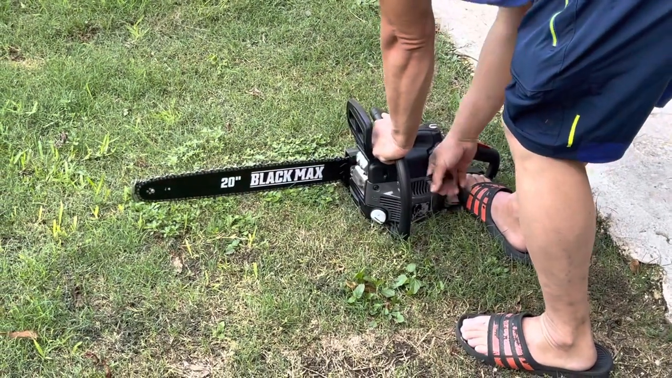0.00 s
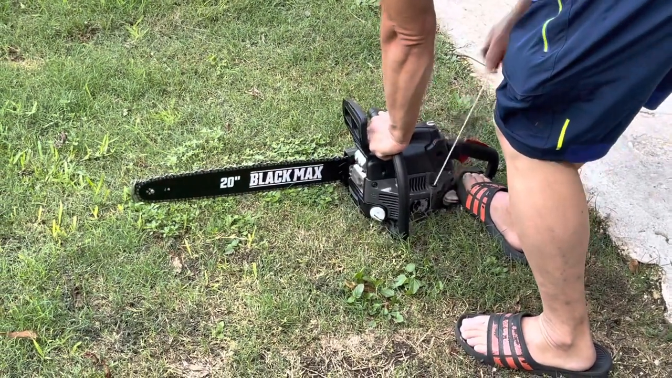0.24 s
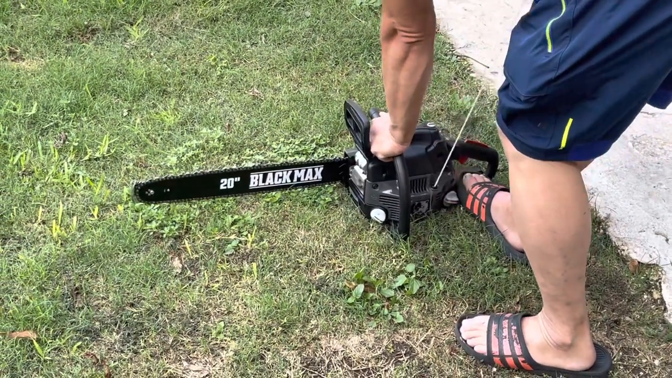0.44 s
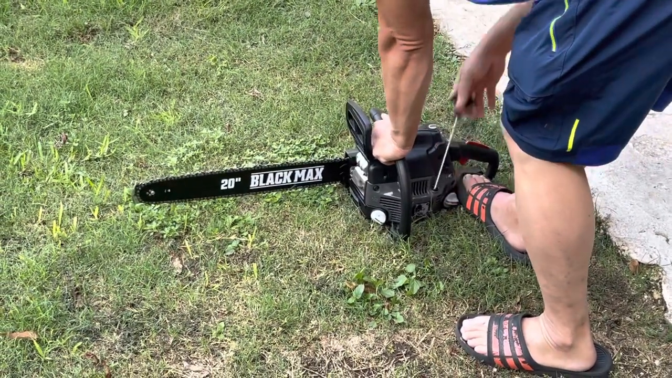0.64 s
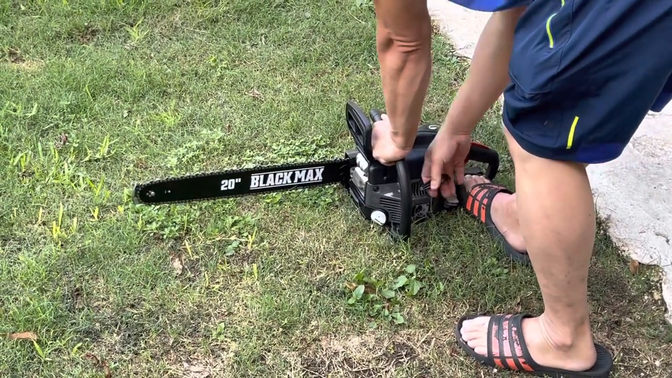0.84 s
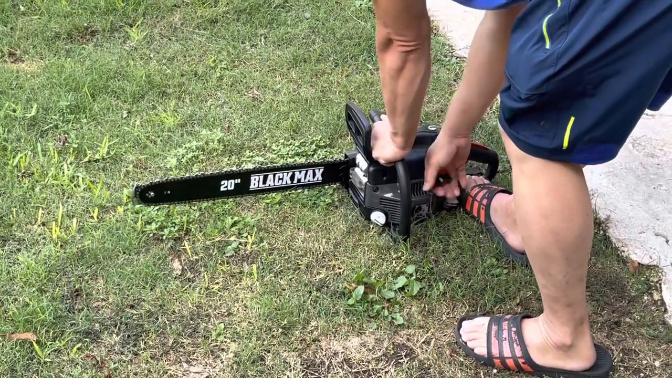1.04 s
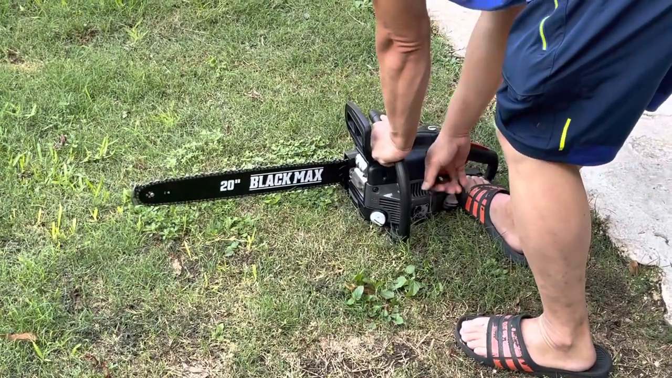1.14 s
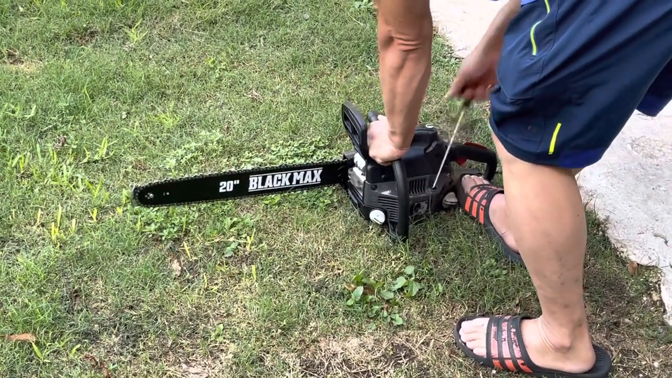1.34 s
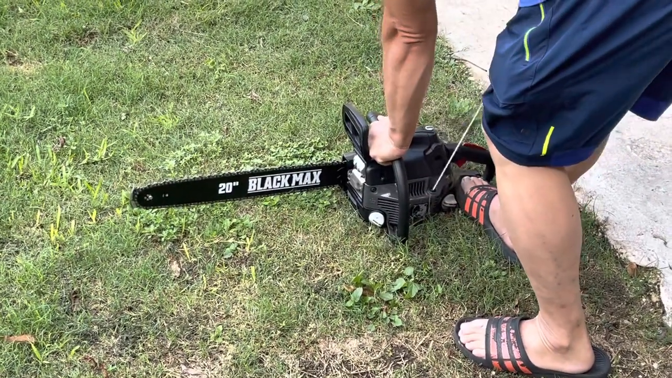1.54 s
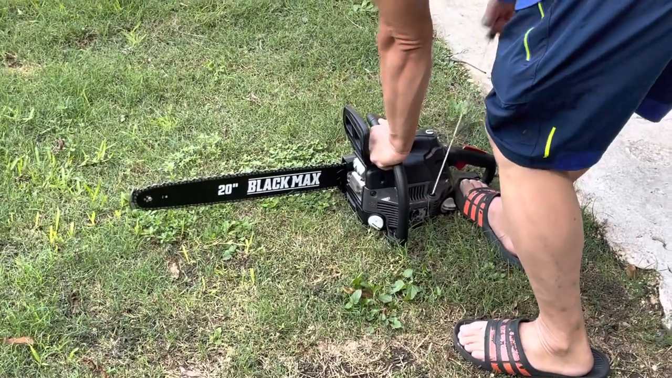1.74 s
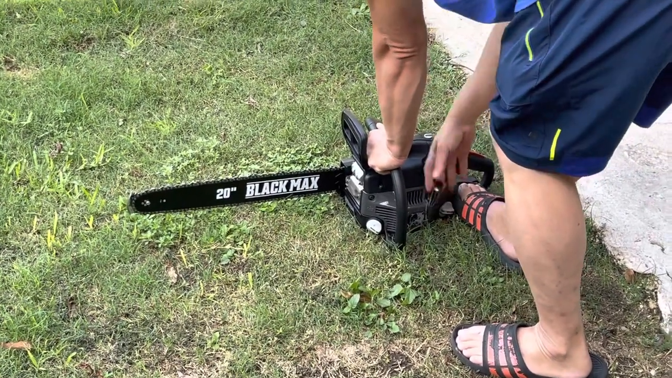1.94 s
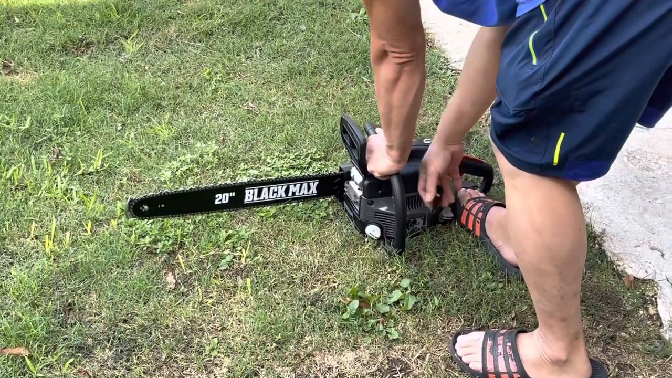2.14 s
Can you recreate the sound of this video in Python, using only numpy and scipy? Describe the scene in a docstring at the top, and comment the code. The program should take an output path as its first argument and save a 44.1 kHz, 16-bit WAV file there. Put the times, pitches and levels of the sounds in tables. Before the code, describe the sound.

Chainsaw starter cord pulled twice, dead engine chugging briefly, cord ratcheting back with a handle knock

```python
"""A chainsaw on a lawn with far traffic rumbling throughout, picked up close by two microphone ports.
First pull: the cord hisses out, cord and flywheel whir, and the dead engine turns over in a few pops.
The cord then rewinds in ratcheting steel pawl clicks until the plastic handle knocks home; the second pull
does the same. Pops and rings are damped sines; hiss, whir, gas and knocks are shaped noise.
Nearby walls answer every sound of the saw, and the two ports hear its treble out of phase."""
import sys
import numpy as np
from scipy import signal
from scipy.fft import rfft, irfft, next_fast_len
from scipy.io import wavfile
from scipy.ndimage import map_coordinates

SR = 44100
rng = np.random.default_rng(int(sys.argv[2]) if len(sys.argv) > 2 else 0)


def bounce(signal):
    """Save signal as a 16-bit WAV file at the path given by the first command-line argument."""
    frames = np.transpose(np.atleast_2d(signal))
    limited = np.clip(frames, -1, 1)
    pcm = np.round(limited * 32767).astype(np.int16)
    wavfile.write(sys.argv[1], SR, pcm)


N = 97020  # samples, 2.2 s


def amp(db):
    """Convert dB to gain."""
    return 10 ** (np.asarray(db) / 20)


def unit(x):
    """Scale to rms 1."""
    return x / np.sqrt(np.mean(x ** 2) + 1e-20)


def along(points, hz):
    """Read (pitch_hz, value) points along a logarithmic frequency axis."""
    point_hz, value = np.transpose(points)
    return np.interp(np.log(hz + 1), np.log(point_hz + 1), value)


def fader(points):
    """Gain that follows (time_s, level_db) points, at -120 dB outside them."""
    return amp(np.interp(np.arange(N) / SR, *np.transpose(points), left=-120, right=-120))


def filtered(x, response):
    """Filter x by a complex response of frequency."""
    m = next_fast_len(N + SR // 2)
    return irfft(rfft(x, m) * response(np.fft.rfftfreq(m, 1 / SR)), m)[..., :N]


def noise(spectrum, peaks=(), peaks_db=0):
    """Noise of rms 1 with a spectrum in dB per Hz and resonances raised above it."""
    def response(hz):
        resonances = sum(amp(db) / np.hypot(1, 2 * (hz - centre) / width) for centre, width, db in peaks)
        return amp(along(spectrum, hz)) * (1 + amp(peaks_db) * resonances)
    return unit(filtered(rng.standard_normal(N), response))


def bursts(rows, attack_s):
    """Envelope of (start_s, level_db, t60_s) bursts that rise quickly, decay exponentially and add in power."""
    t = np.arange(N) / SR
    power = 0
    for start_s, db, t60_s in rows:
        age = np.clip(t - start_s, 0, None)
        power = power + (amp(db - 60 * age / t60_s) * (1 - np.exp(-age / attack_s))) ** 2
    return np.sqrt(power)


GLIDE_S = 0.0041  # time constant of the pitch glide


def tone(start_s, db, start_hz, end_hz, t60_s):
    """A damped sine whose pitch relaxes exponentially from start_hz to end_hz."""
    age = np.clip(np.arange(N) / SR - start_s, 0, None)
    turns = end_hz * age + (start_hz - end_hz) * GLIDE_S * (1 - np.exp(-age / GLIDE_S))
    return amp(db - 60 * age / t60_s) * np.sin(2 * np.pi * turns)


# colour of the far rumble: pitch_hz, level_db (per Hz, relative)
TRAFFIC_COLOUR = [(12, -30), (20, -53.5), (59, 0), (130, -6), (165, -4.5), (295, -20.5), (337, -18.5),
                  (872, -25), (944, -26), (1200, -31.5), (2380, -40.5), (9640, -58), (11000, -66),
                  (14300, -109), (22000, -120)]
# slow drift of the rumble: time_s, level_db
TRAFFIC_LEVEL = [(0.0, -35), (0.19, -34), (1.11, -36.5), (1.7, -37.5), (2.05, -37.5), (2.2, -36.5)]
# stereo width of the rumble: pitch_hz, side_over_mid_db
TRAFFIC_WIDTH = [(60, -27.5), (130, -17), (290, -10), (640, -1.5), (1410, -3), (3100, -20), (6820, -22),
                 (15000, 27)]


def traffic():
    """Far rumble of coloured noise, near mono in the bass because the side part is weak there."""
    mid = noise(TRAFFIC_COLOUR)
    side = filtered(noise(TRAFFIC_COLOUR), lambda hz: amp(along(TRAFFIC_WIDTH, hz)))
    return fader(TRAFFIC_LEVEL) * np.array([mid + side, mid - side])


WALLS_DELAY_S = .012
# how fast the answer of the walls dies: pitch_hz, t60_s
WALLS_DECAY = [(200, 0.57), (2000, 0.49), (6000, 0.49), (12000, 0.35), (13500, 0.14)]


def walls(x):
    """Decaying scatter, faster in the treble; eight tails take turns every 5 ms. Returns echo and side part."""
    delayed = np.pad(x, (round(WALLS_DELAY_S * SR), 0))
    hz, t, cells = signal.stft(rng.standard_normal((8, 2, SR // 2)), SR, nperseg=256)
    decay = amp(-60 * t / along(WALLS_DECAY, hz)[:, None])
    tails = signal.istft(cells * decay, SR, nperseg=256)[1]
    turn = np.arange(len(delayed)) // (SR // 200) % len(tails)
    answer = 0
    for k, tail in enumerate(tails):
        heard = (delayed * (turn == k))[None]
        answer = answer + signal.fftconvolve(heard, tail / np.linalg.norm(tail[0]), axes=1)[:, :N]
    return answer


# hiss of the cord, one list per pull: time_s, level_db
CORD_HISS = [
    [(0.0, -75), (0.122, -58), (0.246, -55), (0.372, -62.5), (0.55, -60)],
    [(1.15, -77), (1.266, -62.5), (1.486, -70.5), (1.7, -57.5)],
]
# colour of the hiss: pitch_hz, level_db (per Hz, relative)
CORD_COLOUR = [(3500, -24.5), (6000, -4.5), (9000, 1.5), (11500, -2), (12800, -23.5), (13500, -60)]


def cord():
    """Fine treble noise as the cord runs out in each pull."""
    return sum(fader(pull) for pull in CORD_HISS) * noise(CORD_COLOUR)


GRAIN_HZ, GRAIN_DB = 315, 3.5  # random level points per second, and their spread
CASING_DB = -1  # gain of all casing resonances
# whir of cord and flywheel, one list per pull: time_s, level_db
WHIR_LEVEL = [
    [(0.2, -117), (0.242, -35), (0.366, -50), (0.45, -72.5)],
    [(1.2, -64), (1.28, -58), (1.46, -38.5), (1.6, -64.5)],
]
# colour of the casing, for whir and clatter: pitch_hz, level_db (per Hz, relative)
CASE_COLOUR = [(410, -28.5), (700, -7), (990, -22.5), (2110, -2), (2300, -8.5), (3910, -5), (4270, -12.5),
               (7830, -14.5), (10000, -13), (11800, -15.5), (13500, -49)]
# casing resonances in the whir: pitch_hz, width_hz, level_db (before CASING_DB)
CASING_PEAKS = [(1450, 120, 3), (2250, 27, -8), (2750, 200, -4), (3750, 68, -19)]


def whir():
    """Cord and flywheel scrape: noise through the casing, made grainy by a random level."""
    grain_points = np.arange(N) / SR * GRAIN_HZ
    grain = amp(GRAIN_DB * map_coordinates(rng.standard_normal(N), [grain_points]))
    scrape = unit(grain * noise(CASE_COLOUR, CASING_PEAKS, CASING_DB))
    return sum(fader(pull) for pull in WHIR_LEVEL) * scrape


CLATTER_DB = -7  # gain of the noisy knocks only
# knocks as parts take up play: start_s, level_db (of the ring's reference), t60_s (of the knock),
# ring_hz, ring_db (relative to level_db)
CLATTER_KNOCKS = [(0.0734, -23, 0.018, 1650, -10.5), (0.2413, -24, 0.021, 2750, 1.5),
                  (0.25, -12, 0.014, 1470, -7), (.266, -24, 0.035, 3200, -3),
                  (.286, -17.5, .02, 2700, -7.5), (.304, -21, 0.043, 2140, -16),
                  (0.339, -28, .03, 1450, -5.5), (.349, -38, .025, 1473, 5), (0.362, -36, 0.021, 2690, 3.5),
                  (1.360, -25, .04, 2750, -1), (1.367, -20.5, 0.055, 2090, -13.5),
                  (1.399, -28.5, 0.037, 3030, -4), (1.408, -17, .03, 1915, -14.5),
                  (1.4238, -19, .03, 3290, -14), (1.445, -25, .03, 2700, -7),
                  (1.454, -21, 0.023, 2810, -13.5), (1.493, -38, 0.039, 1415, 6.5),
                  (1.512, -33.5, 0.024, 2750, 5.5)]


def clatter():
    """Parts taking up play knock the casing: a short noise burst and one ring that lasts slightly longer."""
    envelope = amp(CLATTER_DB) * bursts([row[:3] for row in CLATTER_KNOCKS], 0.0003)
    rings = sum(tone(start_s, db + ring_db, hz, hz, 1.11 * t60_s)
                for start_s, db, t60_s, hz, ring_db in CLATTER_KNOCKS)
    return rings + envelope * noise(CASE_COLOUR, [(8100, 490, 0)])


RATTLE_DB, BODY_DB = -11.5, 2  # added to every rattle and every cover knock
CRACK_T60_S = 0.012
# pawl clicks: start_s, level_db (reference of the click), t60_s (of rattle and cover),
# body_db, ring_db, crack_db (relative to level_db, body_db before BODY_DB)
PAWL_CLICKS = [(0.1021, -41.5, 0.032, 6.5, -5.5, -3), (0.1208, -15, 0.024, -9.5, -2.5, -3),
               (0.5265, -39, 0.14, -6, -7, -2.5), (0.5578, -16, 0.079, -13, 0.5, 2),
               (0.5844, -13.5, 0.049, -12.5, -5, 2), (0.6089, -11, 0.05, -18.5, -3, -0.5),
               (0.632, -12.5, 0.038, -10.5, -2.5, -5.5), (0.6554, -12, 0.05, -15.5, -6.5, 3.5),
               (0.676, -14, 0.064, -11, -1.5, -5.5), (0.7063, -15.5, 0.057, -13, -3, -0.5),
               (0.7364, -12.5, 0.029, -10.5, -1.5, 4.5), (0.7568, -10, 0.052, -15, -4, -3.5),
               (0.7634, -7, 0.027, -24, -7.5, -0.5), (1.6706, -40.5, 0.14, -4, -2, -9),
               (1.7023, -13, 0.064, -13, -2, -1.5), (1.7262, -12.5, 0.081, -15, -1.5, 1.5),
               (1.7477, -12.5, 0.063, -18.5, -0.5, 1.5), (1.7697, -12.5, 0.082, -15, -6, -1),
               (1.7902, -9, 0.046, -17, -3.5, -3), (1.8103, -8.5, 0.049, -19, 0, -4),
               (1.8301, -12, 0.05, -16, -2, -3), (1.8512, -13, 0.053, -13.5, -2, 4.5),
               (1.8685, -9, 0.045, -16, -3, -3.5), (1.8848, -10, 0.1, -14.5, -8, 5),
               (1.9, -8.5, 0.017, -0.5, -4.5, 0)]
# steel modes of the pawl: pitch_hz, level_db (both before random scatter), t60_s
PAWL_MODES = [(3536, -31, 0.057), (4065, -16.5, 0.052), (4650, -24.5, 0.17), (5100, -18, 0.11),
              (5370, -20, .05), (6080, -26.5, 0.097), (6640, -29.5, 0.1), (8440, -10, 0.029),
              (9060, -18.5, 0.082), (10700, 10, 0.013), (11485, -1.5, 0.034), (11940, -12, .04),
              (14260, -19, 0.043)]
# colour of crack and rattle: pitch_hz, level_db (per Hz, relative)
RATTLE_COLOUR = [(590, -46), (1000, -24), (5170, -17.5), (6530, -11.5), (8860, -10.5), (9960, -1.5),
                 (11200, -2), (13500, -26), (15400, -21.5), (16500, -53)]
# colour of the plastic starter cover: pitch_hz, level_db (per Hz, relative)
COVER_COLOUR = [(450, -25.5), (680, -2), (1000, -28), (1500, -15), (2170, -8), (3180, -6.5), (3580, -2),
                (5000, -12.5), (6500, -16.5), (11000, -86)]


def pawl_ring(draws):
    """Sum of damped steel modes, each with its own random level, pitch, phase and wobble rate."""
    t = np.arange(SR // 4) / SR
    ring = 0
    for (hz, db, t60_s), (a, b, c) in zip(PAWL_MODES, draws):
        wobble = 1.5 * np.sin(2 * np.pi * 55 * (1 + 0.21 * c) * t)  # radians, around 55 Hz
        phase = 2 * np.pi * hz * (1 + 0.0033 * b) * t + 3 * c + wobble
        ring = ring + amp(db + 4.6 * a - 60 * t / t60_s) * np.sin(phase)
    return ring * (1 - np.exp(-t / 0.0015))


def pawl():
    """Every click cracks, rings the steel anew with an unsteady pitch, rattles briefly and knocks the cover."""
    rings = np.zeros(N + SR)
    chance = rng.standard_normal((len(PAWL_CLICKS), len(PAWL_MODES), 3))
    for (start_s, db, _, _, ring_db, _), draws in zip(PAWL_CLICKS, chance):
        ring = pawl_ring(draws)
        rings[round(start_s * SR):][:len(ring)] += amp(db + ring_db) * ring
    rattle = bursts([(s, db + RATTLE_DB, t60_s) for s, db, t60_s, *_ in PAWL_CLICKS], 0.00089)
    crack = bursts([(s, db + crack_db, CRACK_T60_S) for s, db, *_, crack_db in PAWL_CLICKS], 0.00046)
    cover = bursts([(s, db + body_db + BODY_DB, t60_s) for s, db, t60_s, body_db, *_ in PAWL_CLICKS], 0.0015)
    return rings[:N] + np.hypot(rattle, crack) * noise(RATTLE_COLOUR) + cover * noise(COVER_COLOUR)


KNOCK_DB, HOUSING_DB = -8, 3.5  # gain of all knocks, gain of the resonances
SPLIT_HZ = 1590  # between hollow body and clack
# the handle knocking home: start_s, clack_db, hollow_db (both before KNOCK_DB), t60_s
HANDLE_KNOCKS = [(0.739, -15, -9, 0.039), (0.756, -7.5, -24, 0.055), (0.7596, -9.5, -5, 0.047),
                 (0.767, -26, -19, .03), (1.898, -7, -30, 0.072), (1.900, 0, -6.5, 0.027),
                 (1.902, -3, 0.5, 0.024), (1.907, -12.5, -6.5, 0.023)]
# colour of the plastic handle: pitch_hz, level_db (per Hz, relative)
HANDLE_COLOUR = [(150, -40), (250, -5), (736, 10), (1040, -6), (1510, 3), (2330, -2.5), (3010, -0.5),
                 (4250, -14), (8230, -5.5), (9000, -1.5), (11700, -44), (19800, -120)]
# resonances of the housing: pitch_hz, width_hz, level_db (before HOUSING_DB)
HOUSING_PEAKS = [(760, 180, -2.5), (1160, 120, 14), (1460, 37, 8.5), (1970, 73, 2.5), (3030, 1300, -1),
                 (3680, 100, 8.5)]


def handle():
    """The plastic handle knocks home: a bright clack, and a hollow body that swells more slowly."""
    def low(hz):
        return 1 / (1 + (hz / SPLIT_HZ) ** 6)
    clack = unit(filtered(noise(HANDLE_COLOUR, HOUSING_PEAKS, HOUSING_DB), lambda hz: 1 - low(hz)))
    hollow = unit(filtered(noise(HANDLE_COLOUR, HOUSING_PEAKS, HOUSING_DB), low))
    clack_level = bursts([(s, clack_db, t60_s) for s, clack_db, _, t60_s in HANDLE_KNOCKS], 0.00058)
    hollow_level = bursts([(s, hollow_db, t60_s) for s, _, hollow_db, t60_s in HANDLE_KNOCKS], 0.0019)
    return amp(KNOCK_DB) * (clack_level * clack + hollow_level * hollow)


POP_START_HZ, POP_END_HZ, POP_T60_S = 389, 101.9, 0.098
LEAD_DB, AFTER_DB = -13, -7  # smaller pops before and after, relative to the main one
FIN_HZ, FIN_DB, FIN_T60_S, FIN_LATE_S = 2171, -26, 0.14, 0.0025  # fin level relative to the pop
PUFF_DB, PUFF_T60_S = -13.5, 0.13  # rush of gas, relative to the pop
# exhaust pops of the unfired engine: start_s, level_db, lead_early_s, after_late_s
ENGINE_POPS = [(0.2496, -9, .006, .0125), (0.2875, -10, .006, .0125), (0.3347, -23, .016, .02),
               (1.3686, -8.5, 0.00711, .014), (1.408, -10.5, 0.00643, .013), (1.4539, -11, .0075, .0165),
               (1.5025, -21, .009, .022)]
# colour of the rush of gas: pitch_hz, level_db (per Hz, relative)
PUFF_COLOUR = [(60, -25), (150, -16.5), (450, 7.5), (800, -10), (1500, -51)]


def chugs():
    """Pops glide down as the port opens, with small higher pops around each and a cooling fin ringing after."""
    out = 0
    for start_s, db, early_s, late_s in ENGINE_POPS:
        out = out - tone(start_s - early_s, db + LEAD_DB, 600, 270, 0.012)
        out = out - tone(start_s, db, POP_START_HZ, POP_END_HZ, POP_T60_S)
        out = out + tone(start_s + FIN_LATE_S, db + FIN_DB, FIN_HZ, FIN_HZ, FIN_T60_S)
        out = out - tone(start_s + late_s, db + AFTER_DB, 450, 170, 0.081)
    return out


def puffs():
    """A rush of gas, low noise that starts with the small pop ahead of each main pop."""
    rows = [(s - early_s, db + PUFF_DB, PUFF_T60_S) for s, db, early_s, _ in ENGINE_POPS]
    return bursts(rows, 0.00067) * noise(PUFF_COLOUR)


# phase between the two microphone ports: pitch_hz, left_lead_rad
PORT_PHASE = [(0, 0), (1210, -.35), (2000, 0), (3190, .65), (4500, .55), (6500, .1), (8010, .3),
              (8700, -.1), (9560, -2.1), (10700, -3.8), (11800, -6.1), (13200, -6.5), (13500, -2.9),
              (14200, -3.9), (14900, -6.2), (16500, -6.9)]
# level between the two ports: pitch_hz, left_over_right_db
PORT_LEVEL = [(60, .2), (200, .6), (700, .7), (1400, -.4), (3000, 0)]


def ports(x):
    """Two close ports share the phase and level offsets equally, half to each side."""
    def response(hz):
        phase = np.exp(np.outer([.5j, -.5j], along(PORT_PHASE, hz)))
        return phase * amp(np.outer([.5, -.5], along(PORT_LEVEL, hz)))
    return filtered(x, response)


WALLS_DB, WALLS_SIDE_DB = -17, -20.5  # gains of the echo and of its side part
# colour of the echo's side part: pitch_hz, level_db (before WALLS_DB and WALLS_SIDE_DB)
SPREAD_COLOUR = [(100, -6), (500, 2), (1200, 19), (4000, -13), (12000, -6.5)]


def scene():
    """The close saw and its echo reach both ports; the echo's side part and the traffic add width."""
    saw = cord() + whir() + clatter() + pawl() + handle() + puffs() + chugs()
    echo, spread = amp(WALLS_DB) * walls(saw)
    side = filtered(spread, lambda hz: amp(along(SPREAD_COLOUR, hz)))
    return ports(saw + echo) + amp(WALLS_SIDE_DB) * np.outer([1, -1], side) + traffic()


CEILING, TOP_HZ = .9, 16800  # soft limit in full scale, band limit


def record(dry):
    """Round off peaks towards a soft ceiling, then keep nothing above the band limit."""
    limited = dry / (1 + np.abs(dry / CEILING) ** 4) ** .25
    return filtered(limited, lambda hz: hz < TOP_HZ)


dry = scene()
out = record(dry)
bounce(out)
```